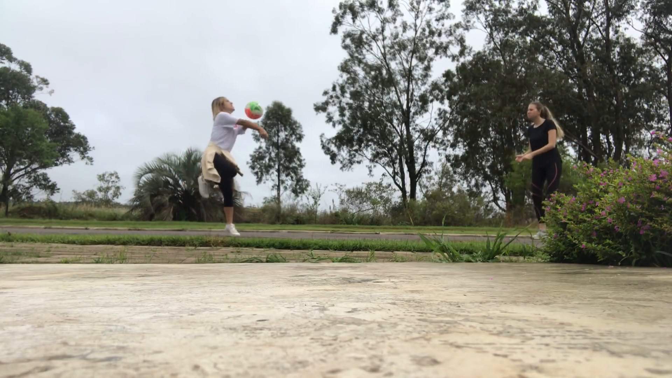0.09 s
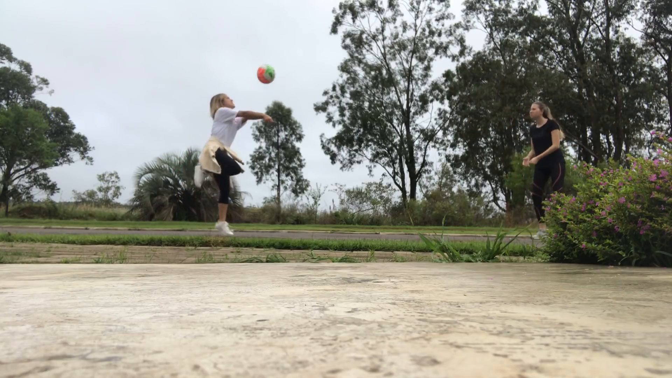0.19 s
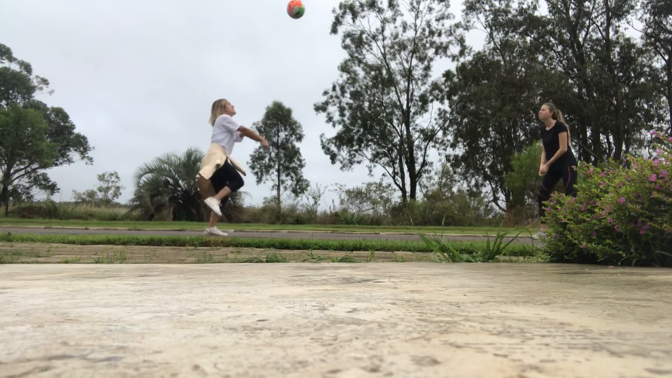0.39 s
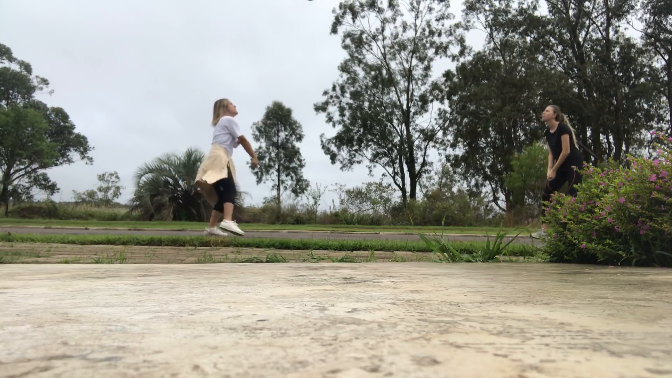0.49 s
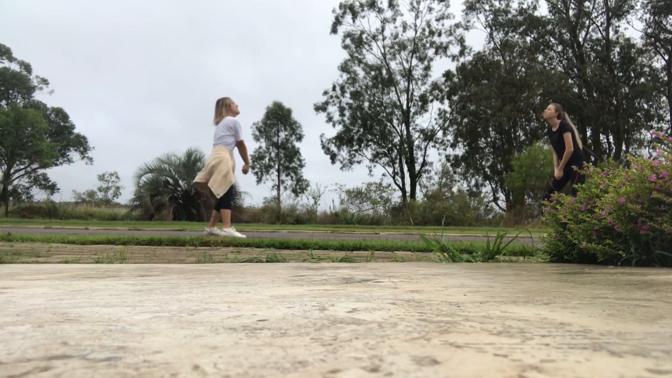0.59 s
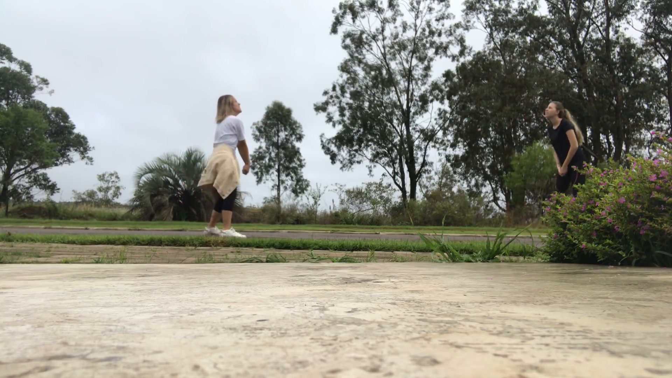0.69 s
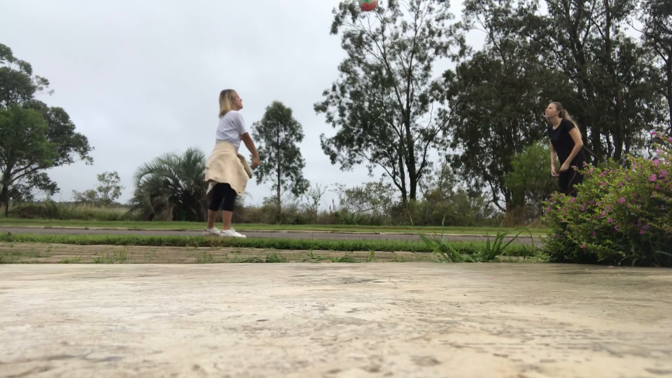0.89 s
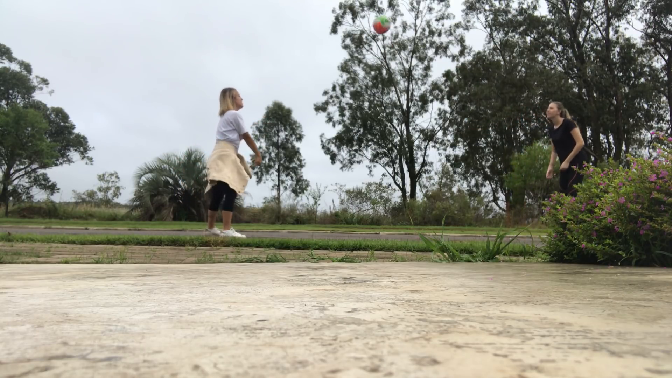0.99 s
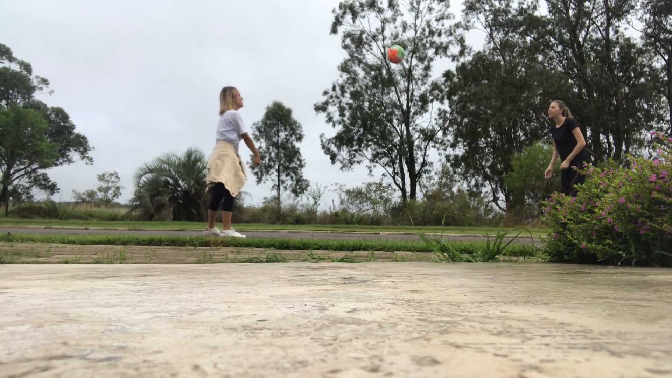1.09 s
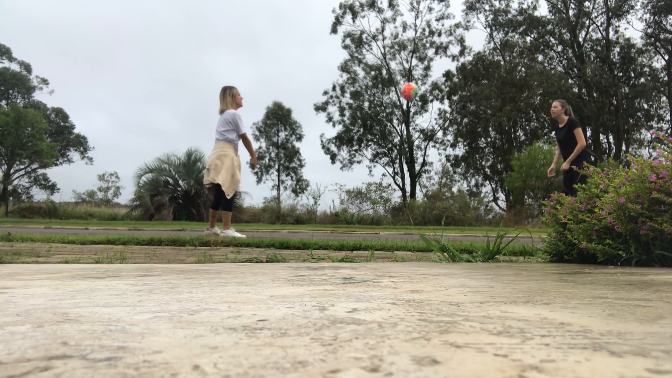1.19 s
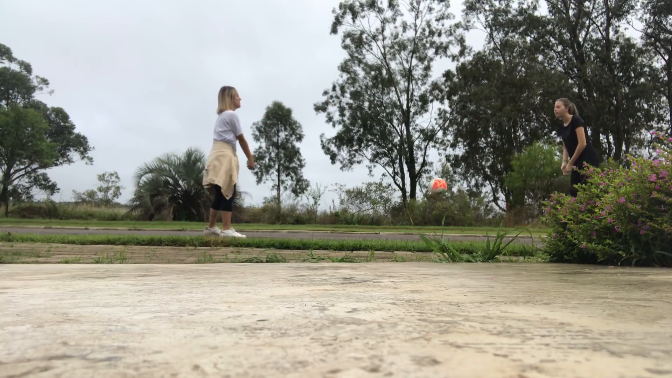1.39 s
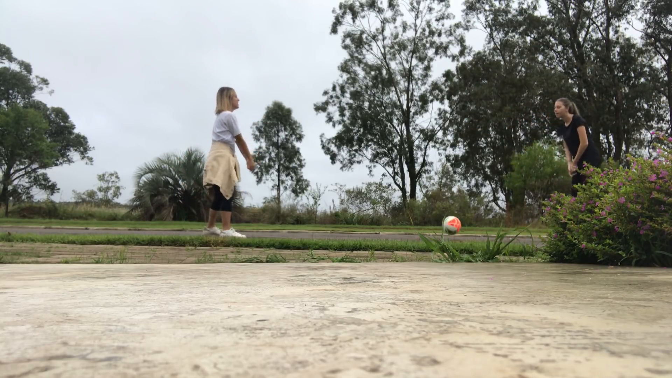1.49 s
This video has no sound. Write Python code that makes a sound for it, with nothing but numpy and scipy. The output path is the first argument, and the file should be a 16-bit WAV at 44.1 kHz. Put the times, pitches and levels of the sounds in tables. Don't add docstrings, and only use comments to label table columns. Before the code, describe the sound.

A volleyball smacks off a player's forearms once at about 0.2 seconds: a crisp skin slap, a quick falling thump, a springy knock and a faint airy ring, with soft echoes from trees. Light shoes crunch and tap on gritty paving before it and intermittently until about 1.45. Thin, falling bird whistles come around 0.65 to 0.9, another very faint near 1.0. Low distant rumble and faint hiss continue throughout.

```python
import sys
import numpy as np
from scipy import signal
from scipy.fft import rfft, irfft
from scipy.io import wavfile
from scipy.ndimage import uniform_filter1d

SR = 44100
rng = np.random.default_rng(int(sys.argv[2]) if len(sys.argv) > 2 else 0)


def int16_out(signal):
    q = np.round(np.clip(np.atleast_2d(signal).T, -1, 1) * 32767)
    wavfile.write(sys.argv[1], SR, q.astype(np.int16))


def invert_db(x):
    u = np.asarray(x, float) / 20
    return 10 ** u


N = 68355

# (time [s], level [dB], time to fade by 60 dB [s])
SLAPS = [
    (0.1996, -19.5, 0.0088),
    (0.1995, -19, 0.014),
    (0.2026, -41, 0.013),
    (0.205, -48, 0.084),
    (0.213, -41, 0.028),
]
HIT_S = SLAPS[0][0]


def evened(x):
    return x / np.sqrt(np.mean(x ** 2) + 1e-20)


def add(mix, s, sound):
    part = mix[round(s * SR):][:len(sound)]
    part += sound[:len(part)]


def read(points, hz):
    f, value = np.transpose(points)
    return np.interp(np.log(hz + 1), np.log(f + 1), value)


def coloured(points, size):
    gain = invert_db(read(points, np.fft.rfftfreq(size, 1 / SR)))
    return evened(irfft(rfft(rng.standard_normal(size)) * gain, size))


def band_noise(x, order, low_hz, high_hz):
    return evened(signal.lfilter(*signal.butter(order, [low_hz, high_hz], "band", fs=SR), x))


def smoothed_twice(x, first, second, axes=(0, 0)):
    x = uniform_filter1d(x, size=first, axis=axes[0])
    return uniform_filter1d(x, size=second, axis=axes[1])


def ring(modes, t):
    return sum(invert_db(db - 60 * t / t60) * np.sin(2 * np.pi * hz * t) for hz, db, t60 in modes)


def airtone():
    # (frequency [Hz], level per Hz [dB])
    air_colour = [(22, -53), (45, -3.5), (62, 0), (245, -15.5), (617, -26), (1090, -35), (6500, -44.5),
                  (16500, -53)]
    level_db, patch_db = -53, 0.8
    z = signal.stft(coloured(air_colour, size=N + 1025), nperseg=1024, noverlap=768)[2]
    patches = rng.standard_normal(z.shape[::-1]).T
    patches = evened(smoothed_twice(patches, 10, 12, axes=(0, 1)))
    bed = signal.istft(z * invert_db(patch_db * patches), nperseg=1024, noverlap=768)[1][:N]
    return invert_db(level_db) * evened(bed)


def shoes():
    # (time [s], grit level [dB], length [s], grit colour [Hz], heel level [dB])
    footsteps = [(0.041, -50.5, 0.01, 1460, -42), (0.066, -61, 0.0033, 3180, -66),
                 (0.0898, -58, 0.00203, 1680, -68), (0.4087, -56.5, 0.0081, 1250, -38.5),
                 (0.5033, -52, 0.00388, 965, -44.5), (0.559, -66, 0.023, 1780, -76),
                 (0.6, -55.5, 0.016, 1580, -44), (0.702, -68.5, 0.0049, 2010, -54),
                 (0.737, -56, 0.047, 2600, -54), (0.906, -66.5, 0.013, 860, -69),
                 (0.983, -67, 0.0173, 2360, -53.5), (1.026, -59.5, 0.004, 1250, -58),
                 (1.235, -76, .008, 1450, -47.5), (1.314, -81, 0.0138, 706, -51),
                 (1.439, -59, 0.0052, 2750, -72), (1.454, -62, 0.024, 1780, -47.5)]
    grit_per_s, grit_spread_db, grit_top_db = 12000, 1.8, -7
    grit_reach = 3.68
    heel_hz, heel_t60_s = 336.7, 0.041
    knock_db, knock_db_per_s, knock_t60_s = 11.5, -400, 0.02
    knock_hz, knock_db_per_octave = 1000, -14
    out, t = np.zeros(N), np.arange(4096) / SR
    for s, grit_db, length, hz, heel_db in footsteps:
        draw, sign = rng.random(4096), rng.standard_normal(4096)
        size = rng.exponential(size=4096)
        grains = (draw < grit_per_s / SR) * sign * invert_db(grit_spread_db * np.minimum(size, 4))
        body = band_noise(grains, 2, 0.46 * hz, 1.382 * hz)
        top = band_noise(grains, 3, 450, min(grit_reach * hz, SR / 3))
        grit = body + invert_db(grit_top_db) * top
        press = np.minimum(t / (0.43 * length), 1)
        press = press * invert_db(-3 * t / length - 60 * np.maximum(t - length, 0) / 0.027)
        sole_db = grit_db + knock_db + knock_db_per_s * length
        sole_db += knock_db_per_octave * np.log2(hz / knock_hz)
        modes = [(heel_hz, heel_db, heel_t60_s), (hz, sole_db, knock_t60_s)]
        knocks = ring(modes, np.maximum(t - 0.35 * length, 0))
        add(out, s, invert_db(grit_db) * press * grit + knocks)
    return out


def slap(out):
    # (frequency [Hz], level per Hz [dB])
    skin_colour = [(450, -8), (750, -4), (2600, -7.5), (3700, -9.5), (6300, -12.5), (8100, -20.5),
                   (15300, -15), (16400, -54)]
    t = np.arange(4096) / SR
    for s, db, t60 in SLAPS:
        add(out, s, coloured(skin_colour, size=4096) * invert_db(db - 60 * t / t60))


def squash(out, t):
    start_s, rise_s, level_db = 0.2008, 0.0009, -11
    top_hz, end_hz, sag_s = 335, 77, 0.003
    ease_db, hold_s, t60_s = -5, 0.0038, 0.064
    hz = end_hz + (top_hz - end_hz) * np.exp(-t / sag_s)
    fade_db = ease_db * np.minimum(t / hold_s, 1) - 60 * np.maximum(t - hold_s, 0) / t60_s
    rise = np.minimum(t / rise_s, 1)
    add(out, start_s, rise * invert_db(level_db + fade_db) * np.sin(2 * np.pi * np.cumsum(hz) / SR))


def release(out, t):
    # (frequency
    # [Hz], level [dB], time to fade by 60 dB [s])
    cover = [(977, -26, 0.026), (630, -26.5, 0.038), (1250, -28.5, 0.017), (414, -15, 0.018),
             (1853, -43.5, 0.14), (2510, -47, 0.2), (4300, -63, 0.15)]
    # (frequency [Hz], level [dB], time to fade
    # by 60 dB [s])
    after_ring = [(1250, -37.5, 0.069), (700, -50, 0.015), (3720, -41, 0.09), (70, -44, 0.34)]
    # (frequency [Hz], level [dB], time to fade by 60 dB [s])
    beating_pair = [(3259, -54, .48), (3265.5, -54.5, .48)]
    release_s, air_rise_s = 0.2129, 0.008
    add(out, release_s, -np.minimum(t / 0.00041, 1) * ring(cover, t))
    add(out, HIT_S, np.minimum(t / air_rise_s, 1) * ring(after_ring + beating_pair, t))


def ball():
    ground_s, ground_share, ground_dull_hz = 0.00084, 0.85, 1300
    out, t = np.zeros(N), np.arange(SR // 2) / SR
    slap(out)
    squash(out, t)
    release(out, t)
    dulled = signal.lfilter(*signal.butter(1, ground_dull_hz, fs=SR), out)
    return out + ground_share * np.roll(dulled, round(ground_s * SR))


def echoes():
    # (delay [s], spread [s], level [dB])
    trees = [
        (.02, 0.0061, -55),
        (0.077, 0.0077, -50.5),
        (0.148, 0.015, -50),
        (0.222, 0.017, -56),
    ]
    # (frequency [Hz], level per Hz [dB])
    tree_colour = [(35, -16), (60, 2.5), (318, -24.5), (497, -40), (559, -29.5), (2700, -39), (3340, -35.5),
                   (13700, -47.5), (16500, -57)]
    yard_db, yard_t60_s = -44, 1
    boom_db, boom_hz, boom_t60_s = -34.5, 149, 0.33
    out, t = np.zeros(N), np.arange(SR) / SR
    swells = sum(invert_db(db) * np.exp(-.5 * ((t - delay) / spread) ** 2) for delay, spread, db in trees)
    wash = invert_db(yard_db - 60 * t / yard_t60_s)
    tail = coloured(tree_colour, size=SR) * (swells + wash)
    boom = band_noise(rng.standard_normal(SR), 2, 0.88 * boom_hz, 2 * boom_hz)
    boom = boom * invert_db(boom_db - 60 * t / boom_t60_s)
    start = np.minimum(t / 0.036, 1)
    add(out, HIT_S, start * (tail + boom))
    return out


def birds():
    # (time [s], pitch [Hz], level [dB])
    falling = [
        (.635, 7740, -77),
        (.656, 7690, -79),
        (.694, 7603, -70.5),
        (.724, 6581, -63),
        (.737, 6320, -69),
        (.75, 6181, -58.5),
        (.765, 6000, -69),
        (.814, 5522, -66),
        (.872, 4957, -83),
    ]
    # (time [s], pitch [Hz], level [dB])
    dropping = [
        (0.72, 6550, -59),
        (0.728, 5796, -63),
        (0.736, 4830, -70),
        (0.742, 4500, -81),
        (0.75, 4452, -86),
    ]
    # (time [s], pitch [Hz], level [dB])
    high = [
        (.718, 7250, -82),
        (.73, 7180, -75),
        (.755, 7050, -76),
        (.785, 6550, -80),
    ]
    # (time [s], pitch [Hz], level [dB])
    rising = [
        (0.78, 5960, -71),
        (0.812, 6703, -73),
        (0.84, 6850, -79),
        (0.862, 6770, -81),
        (0.88, 6750, -77),
    ]
    # (time [s], pitch [Hz], level [dB])
    side = [
        (.706, 5830, -82),
        (.714, 5370, -80),
        (.726, 4300, -71),
    ]
    # (time [s], pitch [Hz], level [dB])
    far = [
        (.985, 9800, -102),
        (1.004, 10050, -85),
        (1.016, 8960, -82),
        (1.037, 8800, -78),
        (1.05, 8750, -82),
        (1.066, 8100, -82),
        (1.08, 7360, -92),
    ]
    flutter_db = 2.2
    out = np.zeros(N)
    for call in (falling, dropping, high, rising, side, far):
        s, hz, db = np.transpose(call)
        flutter = evened(smoothed_twice(rng.standard_normal(N), 200, 200))
        t = np.arange(s[0], s[-1], 1 / SR)
        edge = np.minimum(np.minimum(t - s[0], s[-1] - t) / 0.0022, 1)
        pitch = uniform_filter1d(np.interp(t, s, hz), size=300, mode="nearest")
        level = np.sqrt(2) * invert_db(np.interp(t, s, db) + flutter_db * flutter[:len(t)])
        add(out, s[0], edge * level * np.sin(2 * np.pi * np.cumsum(pitch) / SR))
    return out


def scene():
    edge_hz = 15900
    quiet = airtone() + shoes() + echoes() + birds()
    dulling = signal.cheby2(12, 50, 1.02 * edge_hz, fs=SR, output="sos")
    return (ball() + signal.sosfilt(dulling, quiet))[None]


def roll_off(x):
    return signal.sosfilt(signal.butter(12, 16830, fs=SR, output="sos"), x)


def record(dry):
    mix = signal.lfilter(*signal.butter(2, 32, "high", fs=SR), dry)
    return roll_off(mix)


dry = scene()
out = record(dry)
int16_out(out)
```